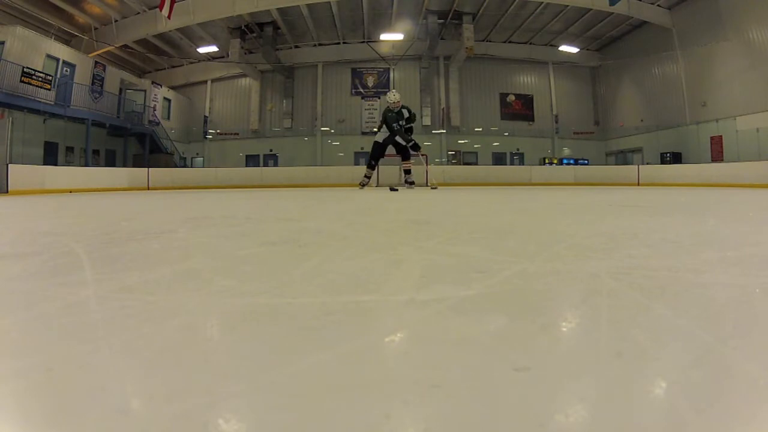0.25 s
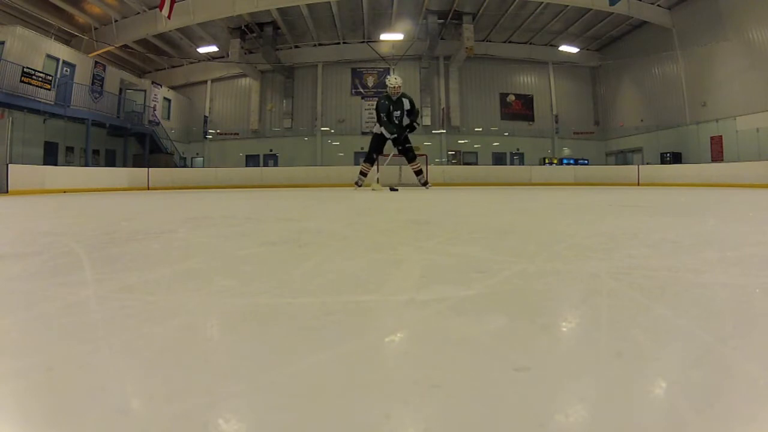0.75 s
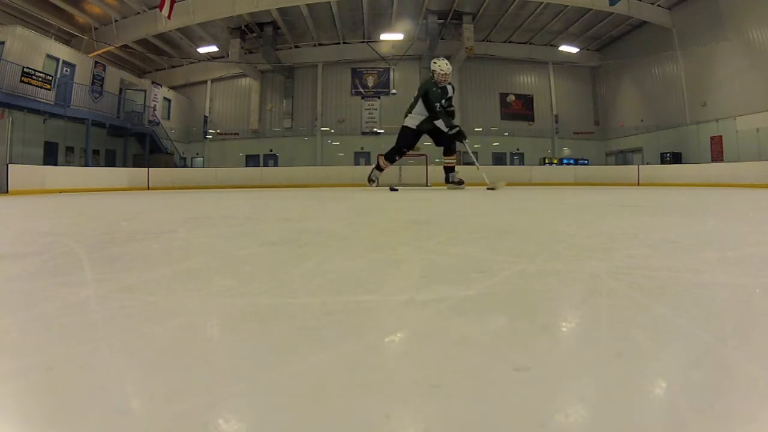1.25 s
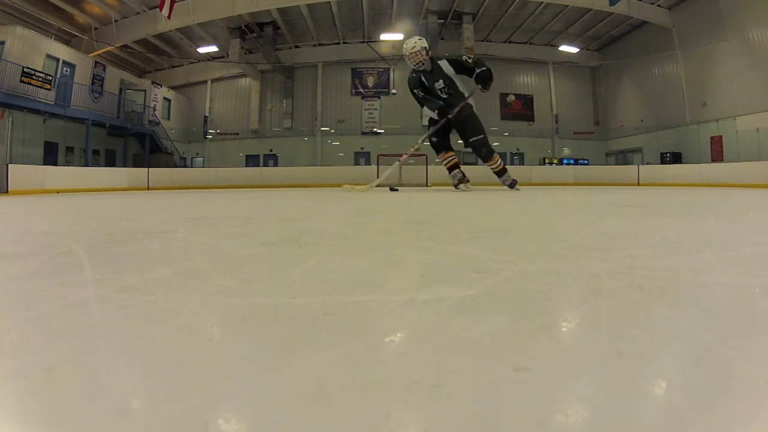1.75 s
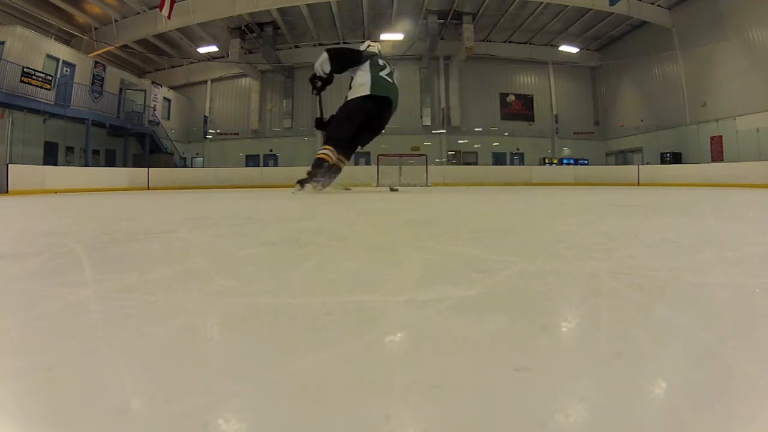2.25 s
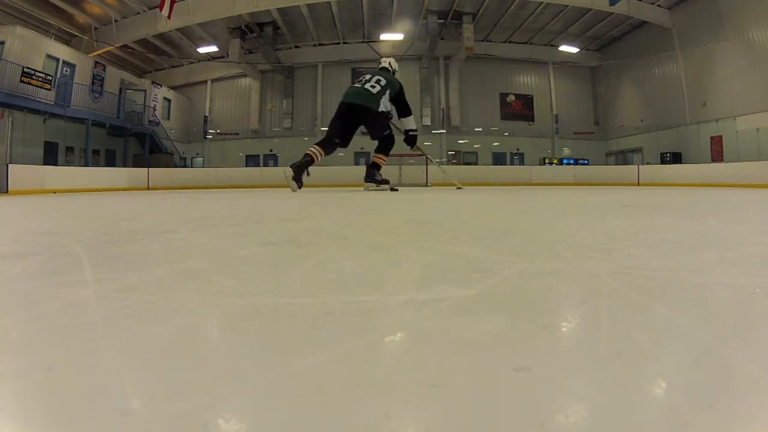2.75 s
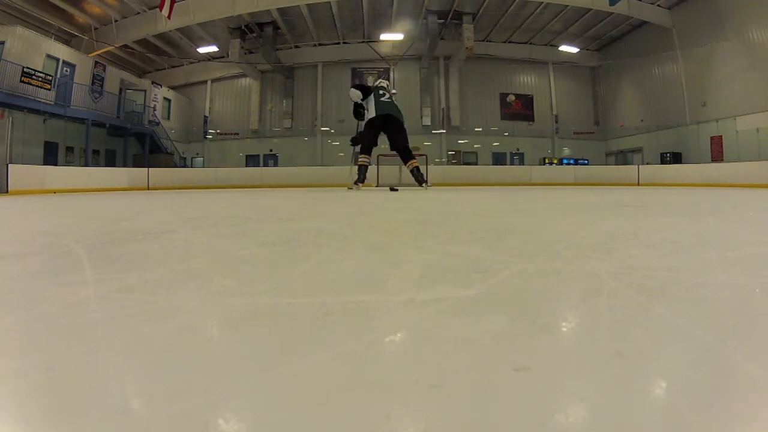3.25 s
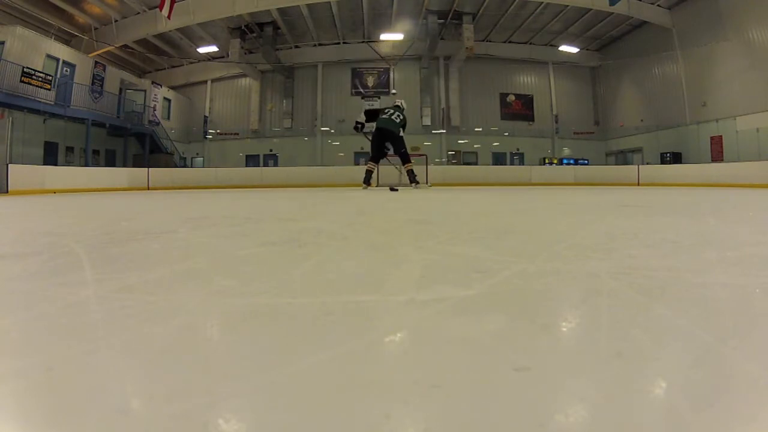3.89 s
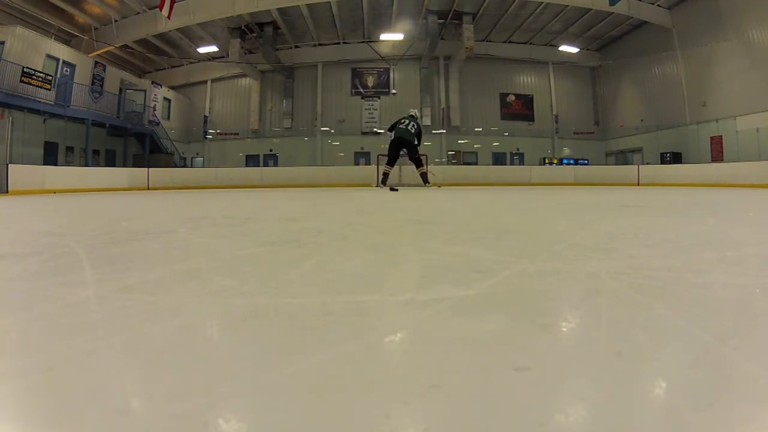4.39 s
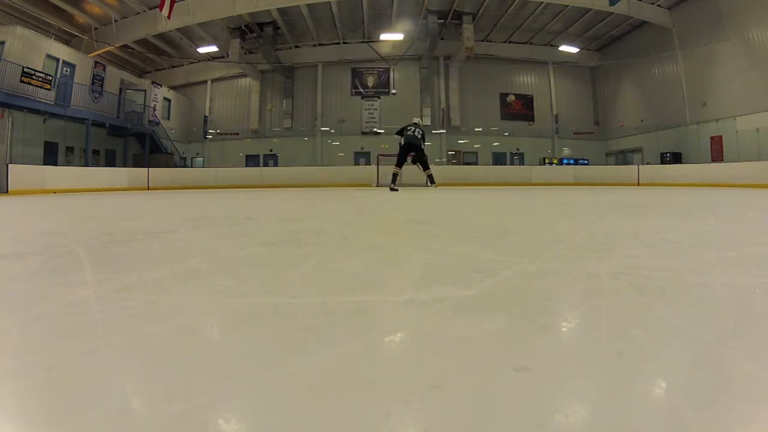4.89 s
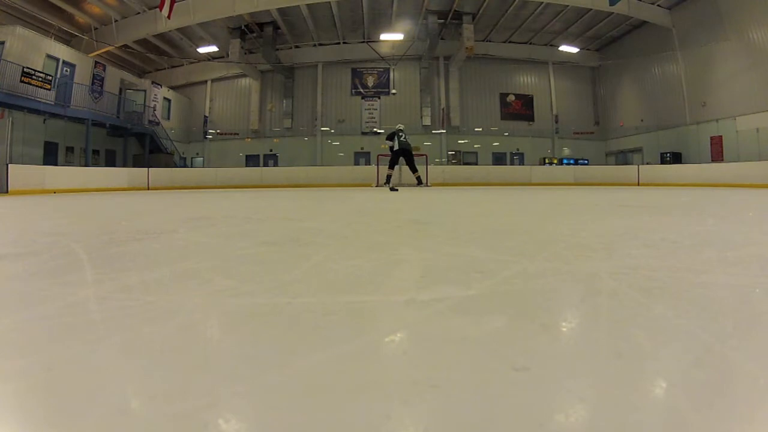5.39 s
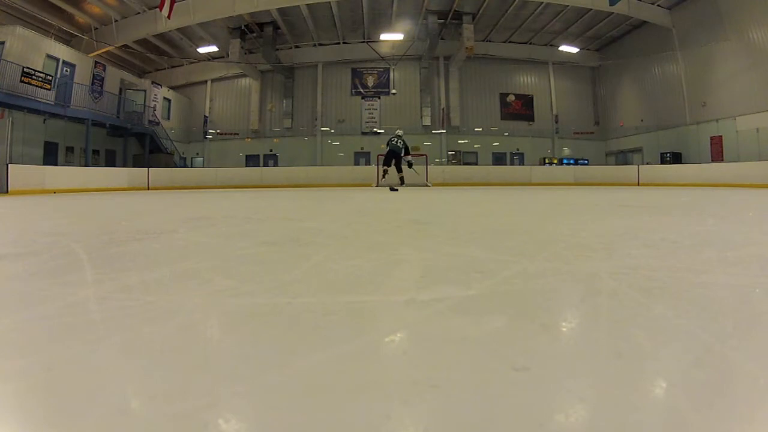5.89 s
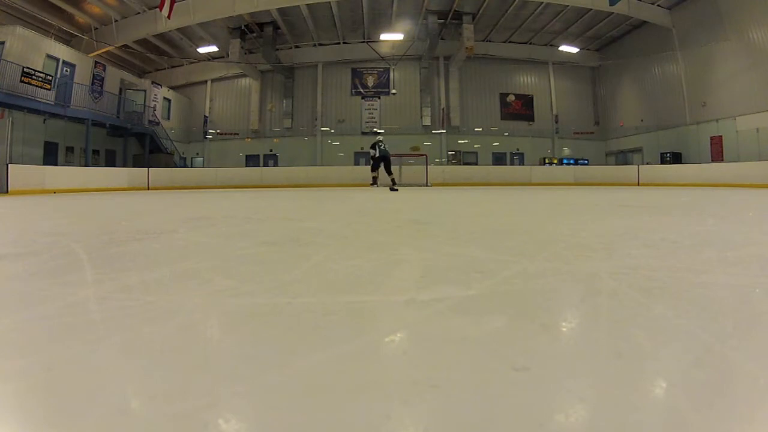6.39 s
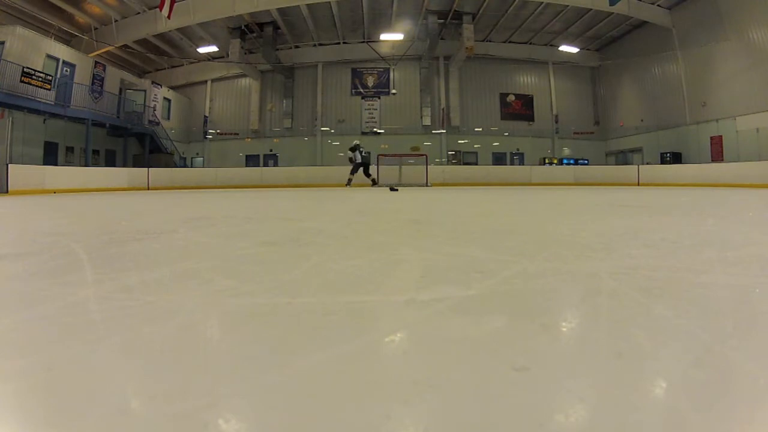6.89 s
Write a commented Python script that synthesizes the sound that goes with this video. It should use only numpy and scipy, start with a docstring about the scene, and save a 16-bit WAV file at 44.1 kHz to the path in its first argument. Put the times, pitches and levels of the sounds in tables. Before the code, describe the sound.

Steady fan rush and a faint low hum fill a reverberant ice hall. A skater taps a puck, carves closer with gritty scrapes, turns with hard cracks and digging blades, then fires off a very loud cluster of stick cracks before moving away with quiet gliding and fluttering echoes. The boxy, slightly gritty pickup lies on the ice, so taps sound knocky and close.

```python
"""A hockey stick cracks against a puck as a player dribbles and shoots in an indoor rink: short bursts of noise.
Blades hiss, scuff and crunch as chips and gritty noise; taps shake a camera's case on the ice as ringing tones.
Each tap flutters between the side boards, and heavy thuds set off slowly fading booms.
Fans rush and hum throughout; echoes and a random tail give the hall.
The camera holds each sample, which mirrors the sound into the treble."""
import sys
import numpy as np
from scipy import signal
from scipy.fft import rfft, irfft
from scipy.io import wavfile

SR = 44100
rng = np.random.default_rng(int(sys.argv[2]) if len(sys.argv) > 2 else 0)


def to_wav(sig):
    """Store sig (one row per channel, or 1-D mono) as 16-bit WAV at the path in sys.argv[1].

    Samples outside -1..1 are clipped; the rate is SR.
    """
    pcm = np.clip(np.atleast_2d(sig), -1, 1) * 32767
    pcm = np.round(pcm).astype(np.int16)
    wavfile.write(sys.argv[1], SR, pcm.T)  # frames by channels


N = 314874  # length of the scene [samples]

# ventilation rush, as a relative spectrum: (frequency [Hz], level [dB])
FAN_SPECTRUM = [(25, -12), (50, -1.5), (80, -0.5), (130, -4.5), (260, 0), (347, -5), (430, -10),
                (900, -8.5), (1150, -12), (1520, 6), (1780, -8), (2350, 7.5), (2950, -15), (3600, -6),
                (5900, -27.5)]
# strides and glides: (start [s], length [s], hiss through the air [dB], rumble through the ice [dB],
# flakes above the hiss [dB])
STRIDES = [(-0.1, .56, -44.5, -52.5, -1), (0.53, 0.084, -46.5, -60, 17), (0.88, 0.073, -45.5, -50, 8.5),
           (1.061, 0.26, -43, -52.5, 11), (1.4, 0.23, -38.5, -47.5, 12), (1.619, 0.39, -43.5, -43.5, 9.5),
           (1.993, 0.25, -40, -38.5, 7), (2.262, 0.15, -47, -49.5, 8), (2.956, 0.23, -37, -47, 13.5),
           (3.404, 0.63, -50.5, -66, 9.5), (4.949, 0.58, -62, -62, 9), (6.084, 0.11, -45, -80, 11.5),
           (6.42, 0.25, -40, -49.5, 13.5), (6.848, 0.39, -44.5, -48.5, 10.5)]
# stick, puck and skates tap the ice: (time [s], knock through the ice [dB], first echo off the boards [dB],
# echo delay [s], echo ring [Hz], echo brightness [dB per octave], change per further crossing [dB])
KNOCKS = [(0.152, -24, -23.5, 0.072, 1494, -3, -11), (0.512, -35.5, -20, 0.075, 2350, 2.5, -2.5),
          (0.888, -26, -29, 0.096, 2204, 5, -5), (1.044, -18, -26.5, 0.064, 2150, 5, -14),
          (1.237, -16, -20.5, 0.081, 2350, 1.5, -5), (2.21, -26.5, -38, 0.066, 2320, 6, -9),
          (2.529, -17, -18.5, 0.077, 2500, 5.5, -4.5), (3.114, -23.5, -21.5, 0.078, 2300, 0.5, -2.5),
          (3.64, -38, -45, .074, 2300, -7, -9), (3.697, -38, -39, 0.11, 2268, -6, -1),
          (4.176, -28, -27.5, 0.061, 2290, -3, 1.5), (5.131, -27, -26, 0.075, 1560, -6.5, -19),
          (5.338, -28, -27.5, .075, 1414, 1.5, -5), (5.701, -27, -14.5, .078, 2550, 4, -3.5),
          (6.307, -34.5, -28.5, 0.076, 2276, 6, -4), (6.353, -35, -25, .075, 1510, 9, -5),
          (6.868, -34.5, -30, 0.082, 2520, -1, 0)]
# stick on puck: (time [s], level [dB], length [ms], brightness [dB per octave])
CRACKS = [(0.511, -22.5, 3.6, -0.5), (0.5269, -21.5, 4, -2.5), (0.6152, -27.5, 3.4, 10),
          (1.2479, -13.5, 3.2, 5), (1.5297, -18, 2.1, -3), (2.5408, -5.5, 1.8, 1.1), (2.6261, -24, 2.7, 15),
          (2.8005, -20, 4.9, -3), (2.9745, -10.5, 1.7, 1.5), (2.9799, -13.5, 3.5, 1),
          (3.014, -14, 2.2, 2.5), (3.9436, -1.5, 2.1, 3.5), (3.9672, -4, 1.7, 0.5),
          (3.975, -7.5, 1.7, -3.5), (4.0144, -7, 2.5, 2), (4.0849, -19, 3.1, -4), (5.471, -28.5, 4.1, 6),
          (6.7462, -21, 3.4, -1)]
# loudest blade digs and stick scrapes: (time [s], level [dB], rise [ms], brightness [dB per octave])
SCUFFS = [(0.826, -29.5, 1.9, -0.5), (1.4715, -25.5, 1.8, 11), (1.6, -23, 1.7, 0),
          (2.9611, -15.5, 2.3, -1.5), (3.0106, -17, 2.5, 3), (3.0444, -13.5, 2.2, -1.5),
          (3.1414, -23.5, 3.1, -3.5), (3.2784, -24, 2.4, -5), (3.922, -24.5, 5.5, 2),
          (4.0065, -9.5, 3.8, -1), (4.0282, -15.5, 2.34, 0.5), (4.0494, -17.5, 2.5, -4),
          (4.1113, -13, 4.3, -1.5), (4.3096, -22.5, 1.5, -4), (6.0385, -26, 3.7, -1)]
# heavy blows on boards and ice: (time [s], level [dB], blow centre [Hz], lag of the bass [s],
# middle boom tone [Hz], boom relative to the blow [dB])
THUDS = [(1.418, -28, 940, 0.015, 243, -28), (1.447, -36, 700, 0.0096, 255, -24),
         (1.549, -34, 245, 0.01197, 238, -17), (2.912, -21.5, 970, 0.018, 182.6, -16),
         (3.846, -34.5, 564, 0.011, 298, -27), (6.487, -26, 540, 0.018, 150, -8.5),
         (6.502, -28.5, 280, 0.016, 259, -5), (7.017, -33, 614, 0.016, 276, -25)]
# how airborne sound is coloured inside the camera's case: (frequency [Hz], level [dB])
CASE_COLOUR = [(59, -57), (100, -24), (198, -33), (308, -18), (342, -43), (372, -20), (506, -15),
               (903, -21.5), (1210, -6.5), (1760, -11.5), (2310, 5.5), (2830, -11.5), (3660, -12),
               (4730, -30), (5900, -38.5), (7670, -127), (13000, -120)]
# ringing tones of the case when shaken from below: (frequency [Hz], level [dB], time to fade 60 dB [s])
CASE_MODES = [(347.3, -8.5, 0.14), (559, -8.5, 0.053), (1141, 9.5, 0.026), (1307, 8, 0.024),
              (1578, 1, 0.04), (1880, 4.5, 0.019), (2337, 1, 0.013), (2630, -37, 0.054), (3270, -4, 0.017),
              (3650, -6, 0.031)]
# what passes from the ice into the case: (frequency [Hz], level [dB])
ICE_PATH = [(30, -36), (90, 4.5), (200, 3), (350, 9), (1200, -4), (3700, -1), (4300, -16), (5800, -12)]
# how long the hall rings: (frequency [Hz], time to fade 60 dB [s])
HALL_FADE = [(150, 7), (500, 6), (1200, 3), (2300, 3.5), (3600, 3), (5500, 1.3)]
# first echoes in the hall, before small random shifts in time: (delay [s], level [dB])
HALL_ECHOES = [(.013, -18), (0.024, -16), (.044, -16.5), (.067, -14), (0.074, -15.5), (.106, -57)]
# how strongly the hall returns each band: (frequency [Hz], level [dB])
HALL_RETURN = [(200, 8.5), (550, 2.5), (1150, 4.5), (1650, 2.5), (2300, -3), (2900, -0.5), (3700, -4),
               (5500, 3.5)]

SIZE = 16384  # length of one short sound [samples]
HZ, AGE, TIME = np.fft.rfftfreq(SIZE, 1 / SR), np.arange(SIZE) / SR, np.arange(N) / SR
FANS_DB, HUM_DB, HUM_HZ = -52, -67, 81
BITE_S = 0.061  # the edge takes this long to bite
RELEASE_DB_PER_S = 131  # and fades at this rate once the weight is off it
BRIGHTEN_PER_DB = 0.22  # harder knocks are brighter: dB per octave for each dB
NEUTRAL_KNOCK_DB = -21  # a knock listed at this level gets no extra brightness
CROSSING_S = 0.0788  # sound crosses the rink from side board to side board
STICK_RING_HZ, BLADE_RING_HZ = 2590, 2180
HOLD_HZ, EDGE_HZ = 12000, 15600  # rate of the held samples, and upper limit of the sound


def gain_of(db):
    """Turns decibels into a plain multiplier."""
    return 10 ** (np.asarray(db) / 20)


def evened(x):
    """Scales a sound to an average strength (rms) of 1."""
    return x / np.sqrt(np.mean(x ** 2) + 1e-20)


def peaked(x):
    """Scales a sound so its highest peak is 1."""
    return x / abs(x).max()


def read(points, hz):
    """Reads between the points of a table, with frequency spaced as in music (logarithmically)."""
    f, value = np.transpose(points)
    return np.interp(np.log(hz + 1), np.log(f + 1), value)


def add(mix, s, sound):
    """Mixes a sound in at a time in seconds."""
    part = mix[round(s * SR):][:len(sound)]
    part += sound[:len(part)]


def through(x, response):
    """Passes a sound through a filter (convolution) and keeps its length."""
    return signal.fftconvolve(x, response)[:len(x)]


def causal(db):
    """Builds the quickest-acting (minimum-phase) filter with the gains db at the frequencies HZ."""
    log_gain = np.log(gain_of(np.maximum(db, -100)))
    both_halves = np.r_[log_gain, log_gain[-2:0:-1]]
    return np.fft.ifft(np.exp(np.conj(signal.hilbert(both_halves)))).real


def octaves(centre_hz):
    """Distance of each frequency from a centre, in octaves; it stops growing below 60 and above 6000 Hz."""
    return np.log2(np.clip(HZ, 60, 6000) / centre_hz)


def wander(rate):
    """Slow random drift of rms 1, holding only changes slower than a rate [Hz]."""
    slow = np.fft.rfftfreq(N, 1 / SR) < rate
    return evened(irfft(rfft(rng.standard_normal(N)) * slow, N))


def fans():
    """Ventilation: steady noise with a fixed colour, plus a hum that wavers in strength and pitch."""
    rush = evened(through(rng.standard_normal(N), causal(read(FAN_SPECTRUM, HZ))))
    hum_phase = 2 * np.pi * HUM_HZ * TIME + 0.36 * wander(5.1)
    hum = evened((1 + 0.36 * wander(0.98)) * np.sin(hum_phase))
    return gain_of(FANS_DB) * rush + gain_of(HUM_DB) * hum


def effort(start, length):
    """One stride: the edge bites, holds and lets go."""
    age = TIME - start
    bite = np.clip(age / BITE_S, 0, 1)
    return bite * gain_of(-RELEASE_DB_PER_S * np.maximum(age - length, 0))


def stride_gains():
    """Strength of the blades over time: hiss in the air, rumble in the ice, flakes; strides add as power."""
    power = 0
    for start, length, air_db, ice_db, flakes_db in STRIDES:
        gains = gain_of([[air_db], [ice_db], [air_db + flakes_db]])
        power = power + (gains * effort(start, length)) ** 2
    return np.sqrt(power)


def chipping(per_s, spread_db, smooth):
    """A blade breaks the ice in chips of uneven size over a smooth hiss."""
    size = gain_of(spread_db * np.minimum(rng.exponential(1, N), 4))
    chips = size * rng.choice([-1, 1], N) * (rng.random(N) < per_s / SR)
    return evened(evened(chips) + smooth * rng.standard_normal(N))


def case_ring(tilt_db, detune=0.0):
    """The case's tones after one push from the ice; neighbouring tones swing in opposite directions."""
    ring = 0
    for k, (hz, db, t60) in enumerate(CASE_MODES):
        tone = np.sin(2 * np.pi * hz * (1 + detune * rng.normal()) * AGE)
        ring = ring + (-1) ** k * gain_of(db - 60 * AGE / t60) * tone
    return through(ring, causal(read(ICE_PATH, HZ) + tilt_db * np.maximum(octaves(1780), -2)))


def blades(hiss_db=-4, rumble_db=2.36, bass_db=-7.5):
    """Blades hiss through the air and judder through the ice; returns both."""
    in_air, in_ice, _ = stride_gains()
    chips = chipping(per_s=600, spread_db=4, smooth=0.8)
    hiss = through(chips, causal(read(CASE_COLOUR, HZ) + 5.6 * octaves(1600)))
    air = evened(hiss) * in_air * gain_of(hiss_db + 2.5 * wander(60))
    push = chipping(per_s=720, spread_db=1.5, smooth=0.82) * in_ice * gain_of(rumble_db + 1.76 * wander(25))
    ring = case_ring(tilt_db=-1.7) * gain_of(-60 * AGE)
    ring = ring / np.linalg.norm(ring)
    # the whole camera rides on the ice, which carries the bass
    sway = causal(read(ICE_PATH, HZ) + bass_db - 6 * np.maximum(octaves(130), 0))
    return air, through(push, ring) + through(push, sway)


def strike_colour(ring_hz, tilt_db, ring_db, ring_width_hz, thin_db):
    """A blow heard through the case: one ring of the struck thing stands out, and the bass is thin."""
    shaft_db = 22 * max(np.log2(2100 / ring_hz), 0)  # low shaft tones ring most clearly
    ring = gain_of(ring_db + shaft_db) / (1 + ((HZ - ring_hz) / ring_width_hz) ** 2)
    body_db = 20 * np.log10(np.hypot(gain_of(read(CASE_COLOUR, HZ)), ring))
    return causal(body_db + tilt_db * np.maximum(octaves(2200), -1) + thin_db * octaves(2300))


def scuff(rise_ms, tilt_db, grit=0.32):
    """A short gritty burst that swells and dies within milliseconds."""
    roughness = np.exp(grit * np.repeat(rng.standard_normal(SIZE // 64), 64))  # a new strength every 64 samples
    crunch = rng.standard_normal(SIZE) * roughness
    u = AGE * 1000 / max(rise_ms, 1)
    colour = strike_colour(BLADE_RING_HZ, tilt_db, ring_db=0, ring_width_hz=140, thin_db=2.4)
    return peaked(through(crunch * u * np.exp(-u), colour))


def crunches(spread_db=1.0, rise_ms=3.46, tilt_db=-0.5, tilt_spread_db=6.5, count=150):
    """Small flakes break off at random; harder strides make them louder."""
    out = np.zeros(N)
    _, _, strength = stride_gains()
    places = ((np.arange(count) + rng.random(count)) * N / count).astype(int)
    for at, (loud, bright) in zip(places, rng.uniform(-1.7, 1.7, (count, 2))):
        flake = scuff(rise_ms, tilt_db + tilt_spread_db * bright)
        add(out, at / SR, strength[at] * gain_of(spread_db * loud) * flake)
    return out


def bend(x, lag, front_hz):
    """Bending waves in a plate: the treble arrives first, 250 Hz a lag [s] later."""
    slowness = np.maximum(np.sqrt(front_hz / np.maximum(HZ, 60)) - 1, 0)
    delay = lag * slowness / (np.sqrt(front_hz / 250) - 1)
    phase = 2 * np.pi * np.cumsum(delay) * HZ[1]
    return irfft(rfft(x) * np.exp(-1j * phase)) * (AGE < AGE[-1] * 0.8)  # cut off the last fifth


def knocks(level_db=2.0, lag=0.004498, scatter=0.033, scatter_s=0.023):
    """Taps spread through the ice as short falling chirps, scatter on its flaws and ring the case."""
    out = np.zeros(N)
    for s, db, *_ in KNOCKS:
        swell = np.exp(-AGE / scatter_s) * (1 - np.exp(-AGE / 0.0058))
        coda = scatter * rng.standard_normal(SIZE) * swell
        push = through(coda, causal(-6 * np.maximum(octaves(610), 0)))  # scattered waves lose their treble
        push[0] += 1  # the direct push
        ring = through(push, case_ring(BRIGHTEN_PER_DB * (db - NEUTRAL_KNOCK_DB), detune=0.0062))
        add(out, s, gain_of(db + level_db) * peaked(bend(ring, lag, front_hz=1930)))
    return out


def crack(ring_hz, length_ms, tilt_db, snap, rise_ms):
    """A snap and a few milliseconds of chatter of the stick's blade, made from fading noise."""
    ms = AGE * 1000
    swell = np.exp(-ms / max(length_ms, 0.3)) * (1 - np.exp(-ms / max(rise_ms, 0.02)))
    blow = rng.standard_normal(SIZE) * swell
    blow[0] += snap
    colour = strike_colour(ring_hz, tilt_db, ring_db=1, ring_width_hz=120, thin_db=2.8)
    return peaked(through(blow, colour))


def flutter(level_db=-2, length_ms=3.36, smear_ms=1.0, dulling_db=-2.5, far_side_s=0.0082, far_side_db=-8,
            count=4):
    """Taps bounce between the side boards, smeared and duller each crossing; the farther side answers later."""
    out = np.zeros(N)
    for s, _, echo_db, delay_s, ring_hz, tilt_db, crossing_db in KNOCKS:
        for k in range(count):
            at = s + delay_s + k * CROSSING_S
            db = echo_db + level_db + k * crossing_db
            for late_s, side_db in ((0, 0), (far_side_s, far_side_db)):
                echo = crack(ring_hz, length_ms, tilt_db + k * dulling_db, 0, smear_ms)
                add(out, at + late_s, gain_of(db + side_db) * echo)
    return out


def cracks(level_db=-3.0, snap=0.46):
    """The stick strikes the puck: a snap with a burst of chatter, coloured by the stick's ring."""
    out = np.zeros(N)
    for s, db, length_ms, tilt_db in CRACKS:
        add(out, s, gain_of(db + level_db) * crack(STICK_RING_HZ, length_ms, tilt_db, snap, rise_ms=0.2))
    return out


def scuffs(level_db=-1):
    """Blade and stick dig into the ice in short gritty bursts."""
    out = np.zeros(N)
    for s, db, rise_ms, tilt_db in SCUFFS:
        add(out, s, gain_of(db + level_db) * scuff(rise_ms, tilt_db))
    return out


def thuds(width_db=4.0, rattle=0.14, rattle_s=0.019, boom_t60=0.69, case_db=-14, split=0.0506):
    """Heavy blows arrive as rough falling chirps that shake the case; close panel tones boom and beat."""
    out = np.zeros(N)
    for s, db, centre_hz, lag, boom_hz, boom_db in THUDS:
        blow = rattle * rng.standard_normal(SIZE) * np.exp(-AGE / rattle_s)
        blow[0] += 1
        blow = through(blow, causal(read(ICE_PATH, HZ) - width_db * octaves(centre_hz) ** 2))
        shaken_case = peaked(through(blow, case_ring(tilt_db=1.0)))
        blow = peaked(blow) + gain_of(case_db) * shaken_case
        panel = 0
        for k in (-1.4, 0, 1):  # three tones close in pitch
            turns = boom_hz * (1 + split * k) * AGE + rng.random()
            panel = panel + np.sin(2 * np.pi * turns) / (1 + abs(k))
        boom = peaked(panel) * gain_of(boom_db - 60 * AGE / boom_t60) * (1 - np.exp(-AGE / 0.032))
        thud = peaked(bend(blow, lag, front_hz=1560)) + bend(boom, lag, front_hz=1440)
        add(out, s, gain_of(db) * thud)
    return out


def hall_response(tail_db, build_s):
    """A few echoes off boards and roof, with a slowly building tail that dies band by band."""
    count = 3 * SR
    taps = rng.standard_normal(count) * (rng.random(count) < 2500 / SR)  # about 2500 reflections per second
    hz, t, z = signal.stft(taps, SR, nperseg=256)
    fade = gain_of(-60 * t / read(HALL_FADE, hz)[:, None])
    tail = signal.istft(z * fade * (1 - np.exp(-t / build_s)), SR, nperseg=256)[1]
    tail *= gain_of(tail_db) / np.linalg.norm(tail)
    for s, db in HALL_ECHOES:
        tail[round(s * rng.uniform(0.95, 1.05) * SR)] += gain_of(db)
    return tail


def hall(x, tail_db, build_s):
    """The paths through the hall change as the player moves: two responses take turns."""
    turn = 2 * np.pi * 2.3 * TIME
    return sum(through(x * share, hall_response(tail_db, build_s)) for share in (np.cos(turn), np.sin(turn)))


def scene():
    """Airborne sounds fill the hall, recoloured on return; what comes through the ice stays nearly dry."""
    hiss, rumble = blades()
    air = cracks() + flutter() + scuffs() + crunches() + hiss
    taps, heavy = knocks(), thuds()
    sent = air + gain_of(-10.5) * taps + gain_of(-9) * heavy
    wet = hall(through(sent, causal(read(HALL_RETURN, HZ))), tail_db=-8.5, build_s=0.055)
    mono = air + taps + heavy + rumble + wet + fans()
    return np.tile(mono, (2, 1))  # the same sound left and right


def record(dry):
    """Holding each sample mirrors the band about the hold rate, with gain f / mirrored f; then the band limit."""
    hz = np.fft.rfftfreq(N, 1 / SR)
    band = rfft(dry) / np.sqrt(1 + (2 * hz / HOLD_HZ) ** 40)  # keep what lies below half the hold rate
    steps = irfft(band * 1j * hz, N) * 2 * np.cos(2 * np.pi * HOLD_HZ * TIME)
    mirrored = rfft(steps) / (1j * np.maximum(hz, HOLD_HZ / 2))
    held = irfft(band + mirrored, N)
    low_pass = signal.firwin(255, EDGE_HZ, window=("kaiser", 9), fs=SR)
    return signal.oaconvolve(held, low_pass[None], "same")


dry = scene()
out = record(dry)
to_wav(out)
```